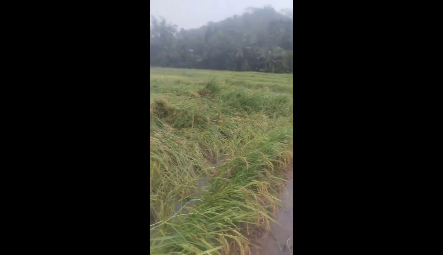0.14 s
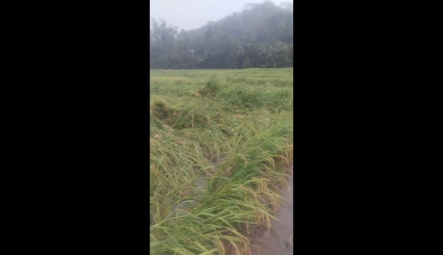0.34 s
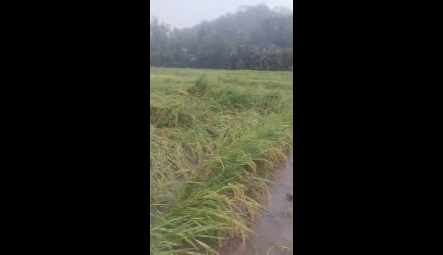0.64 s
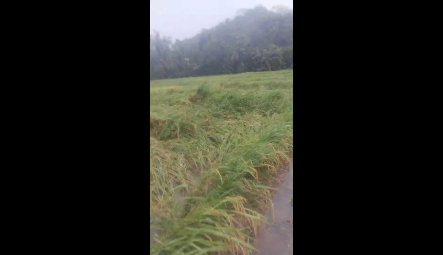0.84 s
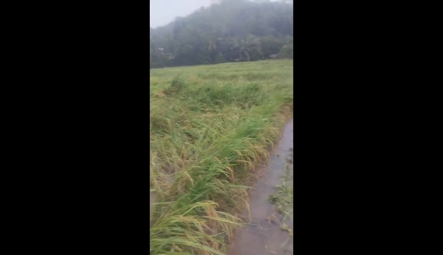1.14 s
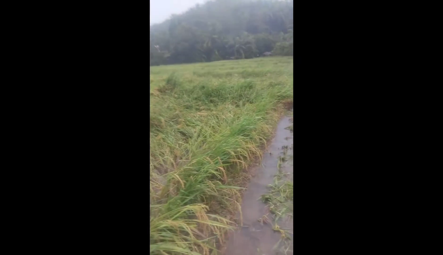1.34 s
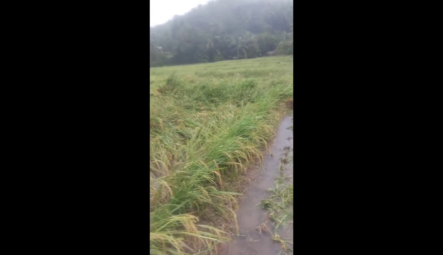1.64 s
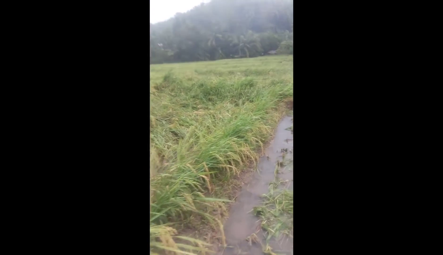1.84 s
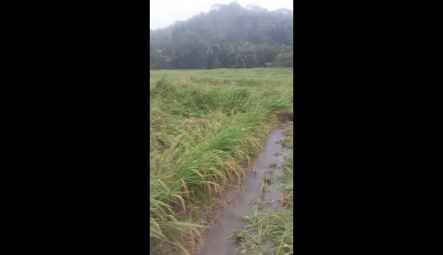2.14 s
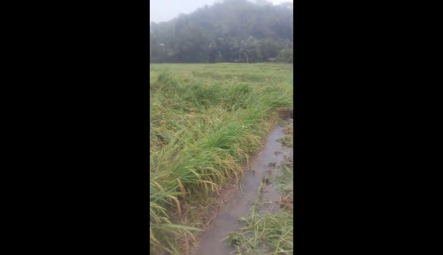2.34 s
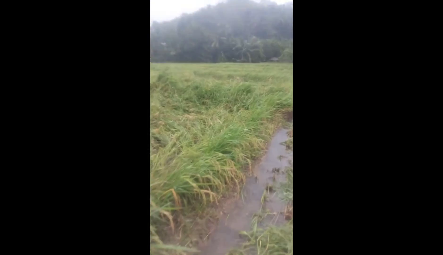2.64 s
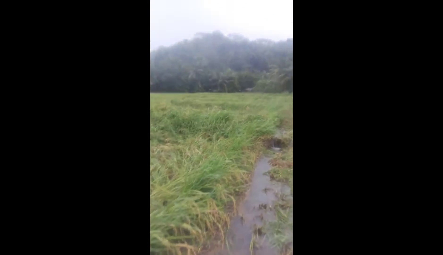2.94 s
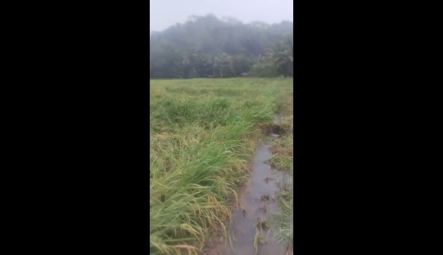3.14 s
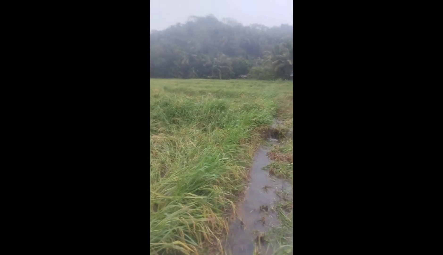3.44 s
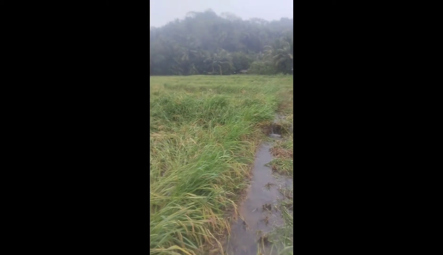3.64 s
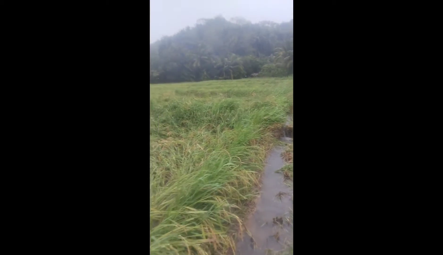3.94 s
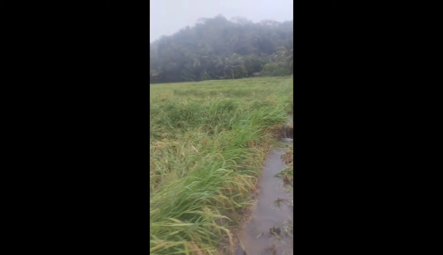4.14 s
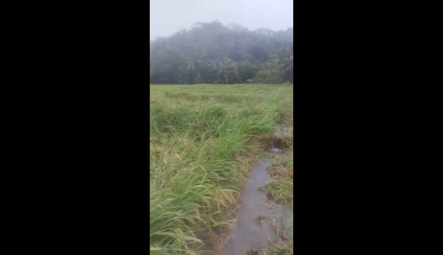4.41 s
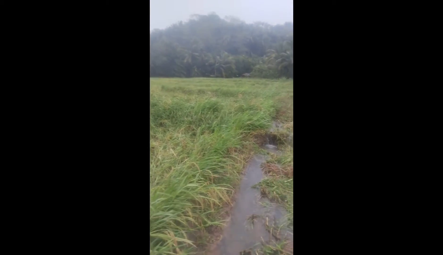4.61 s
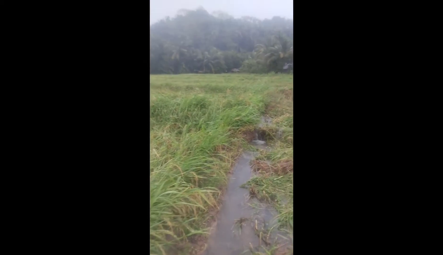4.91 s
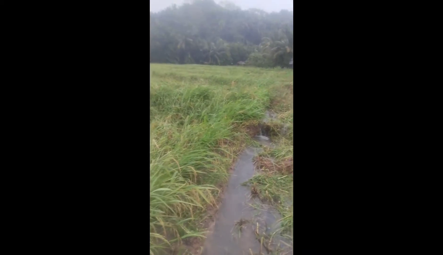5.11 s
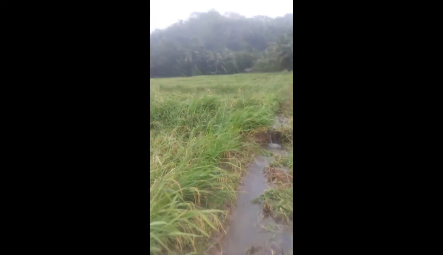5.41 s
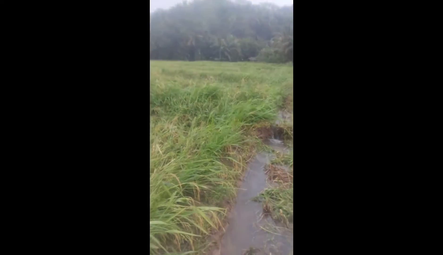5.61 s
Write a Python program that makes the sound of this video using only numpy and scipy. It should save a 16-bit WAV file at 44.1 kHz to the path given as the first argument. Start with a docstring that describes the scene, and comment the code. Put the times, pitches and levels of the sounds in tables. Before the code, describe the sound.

Boots wade through ankle-deep muddy water in a flooded rice field, close to the microphone. A dull heel thud and a sharp double slap come first, then uneven steps slosh, gurgle and plop, with spray and ticking drops. The steps grow busier in the second half, with another hard double slap, then ease off. Faint rain, insects and a few thin bird whistles lie behind, with light wind rumble on the microphone.

```python
"""A rainy rice field: boots wade through ankle-deep muddy water, close to a phone.
Soles slap the surface, and trapped air resonates: single pockets plop, swarms of bubbles slosh and spray.
Rain, insects and a whistling bird lie behind, and wind rumbles on the microphone port.
The phone's noise suppressor ducks the steady background and lets it through, band by band, after each
sound; its gain control dips after the loudest slaps."""
import sys
import numpy as np
from scipy import signal
from scipy.fft import rfft, irfft, next_fast_len
from scipy.io import wavfile
from scipy.ndimage import uniform_filter1d, map_coordinates

SR = 44100
rng = np.random.default_rng(int(sys.argv[2]) if len(sys.argv) > 2 else 0)


def transcribe(signal):
    """Save signal, clipped to [-1, 1], as a 16-bit WAV file at the path in sys.argv[1]."""
    frames = np.atleast_2d(signal).T
    limited = np.clip(frames, -1, 1)
    pcm = np.round(limited * 32767).astype(np.int16)
    wavfile.write(sys.argv[1], SR, pcm)


N = 254456
FADE_IN_S = 0.074

# sheets of water thrown up and falling back; the first two rows, low and at the very start, are a squelch of
# mud: # (time [s], level [dB], low edge [Hz], high edge [Hz], rise [s], t60 [s], spray re level [dB])
WATER_SHEETS = [(.003, -33, 152, 540, 0.012, 0.064, -51.5), (.07, -56.5, 150, 621, 0.036, 0.5, -26),
                (0.599, -40, 1007, 5980, 0.046, 0.36, -17.5), (0.702, -50, 1294, 3205, 0.078, 0.57, -13),
                (1.392, -38.5, 331, 1430, 0.0098, 0.3, -23.5), (1.52, -49, 1467, 2674, 0.0015, .3, -19),
                (1.7, -41, 883, 3370, 0.013, 0.35, -16), (2.259, -48.5, 725, 1387, 0.0058, 0.44, -24),
                (2.317, -50, 1600, 4830, 0.02, 0.47, -28.5), (2.411, -48, 1296, 5400, 0.016, 0.33, -15.5),
                (2.667, -36, 909, 4610, .014, 0.53, -23.5), (2.929, -39, 250.5, 3554, 0.015, .3, -21),
                (3.078, -46, 489.4, 2370, 0.018, 0.53, -28.5), (3.239, -49.5, 408, 1212, 0.02, 0.48, -29.5),
                (3.625, -46, 2013, 5606, 0.026, 0.8, -13.5), (3.691, -41.5, 919, 3615, .012, 0.84, -20.5),
                (3.858, -36.5, 1012, 6700, 0.005, 0.23, -14), (3.96, -43, 896, 3000, 0.016, 0.77, -21.5),
                (4.055, -42, 790, 3590, 0.018, .4, -17.5), (4.282, -47.5, 497, 3500, 0.016, .5, -17.5),
                (4.47, -58.5, 700, 1390, 0.035, .5, -28.5), (4.498, -57, 1958, 6040, .06, 0.66, -21.5),
                (4.595, -47.5, 1215, 3000, 0.015, .5, -24.5),
                (4.729, -48.5, 1730, 3203, 0.041, 0.67, -15.5), (4.788, -50, 2920, 8030, 0.046, 0.57, -8.5),
                (4.998, -36.5, 1166, 6000, 0.015, .3, -20.5)]


def amp(db):
    """Amplitude ratio of a level in decibels."""
    return np.exp(np.asarray(db) * (np.log(10) / 20))


def unit(x):
    """Normalisation to rms 1."""
    return x / np.sqrt(np.mean(x ** 2) + 1e-20)


def along(points, hz):
    """Interpolation of (frequency [Hz], value) points on a logarithmic axis."""
    knots_hz, values = np.transpose(points)
    return np.interp(np.log(hz + 1), np.log(knots_hz + 1), values)


def curves(rows):
    """Linear interpolation, sample by sample, of each column after the time."""
    times, *columns = np.transpose(rows)
    return [np.interp(np.arange(N) / SR, times, column) for column in columns]


def wobble(rate):
    """Random modulation: a smooth curve with rate knots a second."""
    knots = rng.standard_normal(int(N * rate / SR) + 4)
    return map_coordinates(knots, [np.arange(N) * rate / SR])


def band(lo_hz, hi_hz):
    """Band-pass response with sixth-order slopes."""
    return lambda hz: 1 / (1 + (lo_hz / (hz + 1)) ** 6) / (1 + (hz / hi_hz) ** 6)


def filtered(x, response):
    """Linear filtering: the spectrum times a frequency response."""
    size = next_fast_len(N + 8192)
    return irfft(rfft(x, size) * response(np.fft.rfftfreq(size, 1 / SR)), size)[..., :N]


def noise(response):
    """White noise coloured by a frequency response."""
    return filtered(rng.standard_normal(N), response)


def narrow(centre_hz, width_hz):
    """Narrow-band noise of rms 1."""
    return unit(noise(lambda hz: 1 / (1 + (2 * (hz - centre_hz) / width_hz) ** 2)))


def add(track, s, sound):
    """Superposition of a short sound at s seconds."""
    part = track[round(s * SR):][:len(sound)]
    part += sound[:len(part)]


def swell(t, rise, t60):
    """Envelope that reaches 1 in rise seconds, then decays exponentially."""
    return amp(-60 * np.abs(t - rise) / t60) * np.clip(t / rise, 0, 1) ** 2


def ring(t, hz, t60, glide=0):
    """Damped oscillator, such as a bubble, whose pitch climbs by the fraction glide within t60."""
    attack = 1 - np.exp(-t * hz * 1.6)
    phase = 2 * np.pi * hz * (t + glide * t * t / (2 * t60))
    return attack * amp(-60 * t / t60) * np.sin(phase)


def swarm(lo_hz, hi_hz, rate, cycles, scatter_db):
    """Incoherent sum, rms 1, of bubbles of random size and onset; each falls 30 dB in cycles periods."""
    when, size, strength = rng.random((int(rate * N / SR), 3)).T
    hz = lo_hz * (hi_hz / lo_hz) ** size
    gain = amp(-scatter_db * np.log(strength + 0.015))
    life = (1.15 * cycles / hz * SR).astype(int)
    # all bubbles end to end; age counts the samples since each one's onset
    age = np.arange(life.sum()) - np.repeat(np.cumsum(life) - life, life)
    start, hz, gain = (np.repeat(v, life) for v in ((when * N).astype(int), hz.astype(np.float32), gain))
    grains = gain * ring((age / SR).astype(np.float32), hz, 2 * cycles / hz, glide=0.1)
    return unit(np.bincount(start + age, grains, N)[:N])


def wind():
    """Turbulent pressure on the microphone port: a low rumble that comes in gusts."""
    spectrum = [(12, -72.5), (20, -33.5), (113, -5.5), (206, -19), (282, -25), (319, -41.5), (400, -21.5),
                (520, -51), (880, -120)]  # rumble: (frequency [Hz], relative level [dB])
    strength = [(0.0, -43.5), (0.22, -76), (1.04, -65), (1.53, -66.5), (1.72, -79), (2.14, -75),
                (2.62, -65), (2.99, -76), (3.18, -69), (3.41, -65), (3.58, -54.5), (3.84, -76.5),
                (4.13, -74), (4.31, -67.5), (4.52, -74), (4.55, -59.5), (4.84, -72.5), (4.9, -66),
                (5.11, -65.5), (5.45, -68.5), (5.77, -65.5)]  # wind before the gusts are added: (time [s], level [dB])
    rumble = unit(noise(lambda hz: amp(along(spectrum, hz))))
    gusts_db = 10 * np.abs(wobble(4)) ** 0.19
    return amp(curves(strength)[0] + gusts_db) * rumble


def splashes():
    """Bubble size sets pitch: each splash is a dense patter, filtered to its own range of sizes."""
    out, t = np.zeros(N), np.arange(SR // 2) / SR
    patter = swarm(1000, 7000, rate=2000, cycles=20, scatter_db=4)
    patter += 0.9 * swarm(250, 1500, rate=220, cycles=18, scatter_db=3)
    patter += amp(-12) * rng.standard_normal(N)  # foam
    hz = np.fft.rfftfreq(len(t), 1 / SR)
    for s, db, lo, hi, rise, t60, _ in WATER_SHEETS:
        excerpt = patter[round(s * SR):][:len(t)]
        drops = unit(irfft(rfft(excerpt) * band(lo, hi)(hz), len(t)))
        add(out, s, amp(db) * swell(t, rise, t60) * drops)
    return out


def wading():
    """Bubble resonance in four size classes, swelling as the legs push water, over a hiss of foam."""
    flow = [(0.0, -74.5, -81), (0.18, -79.5, -78), (0.46, -77.5, -78), (0.69, -46.5, -68.5),
            (0.9, -63, -58), (1.16, -65, -66.5), (1.64, -65, -65.5), (2.1, -69.5, -64.5),
            (2.71, -55.5, -64.5), (2.83, -54, -59), (2.97, -42, -69.5), (3.18, -61.5, -74.5),
            (3.39, -58, -76), (3.91, -51.5, -71.5), (4.1, -53, -72.5), (4.4, -62.5, -73.5),
            (4.72, -54, -60.5), (4.92, -60, -67), (5.16, -69, -62.5), (5.77, -78, -70.5)]  # water pushed by the legs: (time [s], slosh level [dB], spray level [dB])
    # large bubbles welling up as a boot sinks or pulls free: (time [s], level [dB], t60 [s])
    gurgles = [(.53, -42.5, 0.39), (0.649, -68.5, 0.42), (1.397, -41, 0.17), (2.27, -61, 0.8),
               (2.628, -48, 0.34), (2.911, -48, 0.31), (2.978, -39.5, 0.15), (3.085, -47.5, 0.34),
               (3.25, -52, 0.68), (3.472, -38.5, 0.26), (3.571, -49, 0.16), (3.72, -59, 0.56),
               (4.05, -53, 0.81), (4.182, -34.5, 0.52), (4.21, -30, 0.14), (4.288, -49.5, 0.12),
               (4.439, -55.5, 0.79), (4.7, -51.5, 0.24), (4.9, -64, 0.37), (5.5, -61, 0.43)]
    # bubbles of gurgle, slosh, froth and spray: (lowest [Hz], highest [Hz], rate [1/s], life [cycles])
    size_classes = [(267, 2600, 490, 5.2), (830, 3900, 1600, 11), (3960, 8000, 1200, 5.5),
                    (8800, 15000, 3300, 1.5)]
    out, t = np.zeros(N), np.arange(SR // 2) / SR
    slosh_db, spray_db = curves(flow)
    slosh, spray = amp(slosh_db), amp(spray_db - 1.5)
    gurgle = np.full(N, amp(-78))  # floor between gurgles
    for s, db, t60 in gurgles:
        add(gurgle, s, amp(db) * swell(t, rise=0.0081, t60=t60))
    for s, db, _, _, rise, t60, thrown_db in WATER_SHEETS:
        add(spray, s, amp(db + thrown_db) * swell(t, rise, t60))
    froth = np.sqrt(slosh * spray) * amp(1.5)
    for envelope, (lo, hi, rate, cycles) in zip([gurgle, slosh, froth, spray], size_classes):
        foam = amp(-4) * unit(noise(band(lo, hi)))
        bubbles = filtered(swarm(lo, hi, rate, cycles, scatter_db=7.5), band(lo, hi))
        flutter = amp(1.2 * np.clip(wobble(25), -2, 2))
        out += envelope * flutter * unit(bubbles + foam)
    return out


def drips():
    """Single drops fall off the leaves, each a brief damped oscillation."""
    # dripping: (lowest [Hz], highest [Hz], rate [1/s], life [cycles], level [dB])
    drops = (897, 4197.5, 65.5, 24, -65)
    lo, hi, rate, cycles, db = drops
    return amp(db) * swarm(lo, hi, rate, cycles, scatter_db=2)


def rain():
    """Countless impacts on leaves and water add incoherently to a wavering broadband noise."""
    spectrum = [(200, -52.5), (570, -45.5), (1150, -43), (1800, -47), (2650, -48.5), (4200, -55),
                (5200, -62), (6000, -51.5), (10800, -62), (13400, -51.5), (15000, -63.5), (15700, -69.5)]  # rain hiss: (frequency [Hz], gain on white noise [dB])
    hiss = noise(lambda hz: amp(along([(100, -105.5)] + spectrum, hz)))
    return hiss * amp(0.6 * wobble(8) + 1.2 * wobble(40))


def insects():
    """The calls of a far chorus merge into one band of amplitude-modulated noise."""
    call_band = (8050, 840)  # pitch range of the calls: (centre [Hz], width [Hz])
    chorus = [(.1, -71), (.27, -60), (.58, -61), (1.3, -57.5), (1.93, -55.5), (2.43, -57.5), (3.49, -59.5),
              (3.87, -58.5), (4.25, -62), (5.0, -56.5), (5.77, -57)]  # swell of the chorus: (time [s], level [dB])
    return amp(curves(chorus)[0] + 0.6 * wobble(4.2) + 1.4 * wobble(150)) * narrow(*call_band)


def murmur():
    """Narrow noise bands flicker by random amplitude modulation, like far frogs and crickets."""
    voices = [(1420, 130), (3350, 78), (4580, 130), (5150, 57)]  # background bands: (centre [Hz], width [Hz])
    levels = [(.1, -70, -72.5, -71.5, -71), (.45, -58.5, -71.5, -73, -67), (.9, -58, -69.5, -66.5, -70),
              (1.3, -56, -67.5, -67, -67), (1.85, -56, -70.5, -70.5, -67.5), (2.15, -59, -71.5, -70, -65.5),
              (2.5, -54, -68, -70.5, -66.5), (2.85, -52.5, -68, -73.5, -69),
              (3.299, -55.5, -69.5, -72.5, -74.5), (4.5, -56, -69, -71.5, -68.5),
              (5.2, -62.5, -63, -71, -68), (5.4, -55, -71, -68, -68), (5.77, -60, -71.5, -74, -74)]  # their swell: (time [s], level of each of the four bands [dB])
    return sum(amp(db + 2.85 * wobble(35) + 1.2 * wobble(6.6)) * narrow(hz, width)
               for (hz, width), db in zip(voices, curves(levels)))


def ticks():
    """An impulse has a broad spectrum: bright spikes trailing crackle, with faint ones at random."""
    impacts = [(0.389, -33.5), (0.5164, -22), (0.5465, -20.5), (0.6545, -25.5), (.783, -38), (0.8074, -43),
               (0.8934, -35), (0.9283, -35), (0.9622, -30.5), (1.0294, -45), (1.1364, -43.5), (1.285, -40),
               (1.3957, -30), (1.4067, -26.5), (1.703, -27.5), (2.1505, -39.5), (2.1844, -30.5),
               (2.4688, -32), (2.6309, -26), (2.677, -35), (2.7044, -31.5), (2.7841, -27.5), (2.803, -40),
               (2.9014, -32), (2.9333, -45.5), (2.9512, -36.5), (2.9905, -25), (3.0045, -36.5),
               (3.2535, -30.5), (3.3044, -37.5), (3.4741, -28), (3.4987, -34), (3.5613, -26.5),
               (3.6423, -37.5), (3.6682, -34), (3.6965, -28.5), (3.8014, -38), (3.8474, -41.5),
               (3.8691, -29), (3.8822, -26.5), (4.0196, -40), (4.0598, -38.5), (4.0801, -32.5),
               (4.1481, -32), (4.2076, -22.5), (4.2926, -39.5), (4.3051, -32.5), (4.8266, -35.5),
               (5.0075, -33), (5.0324, -34), (5.3607, -31.5)]  # drops striking leaves and boots, water films tearing: (time [s], level [dB])
    faint_per_s, t60 = 25, 0.004
    out, t = np.zeros(N), np.arange(SR // 50) / SR
    when, size = rng.random((int(faint_per_s * N / SR), 2)).T
    faint_s = FADE_IN_S + when * (N / SR - FADE_IN_S)
    faint_db = -51 - 4 * np.log(size + 0.1)
    spike = 4.1 * (t == 0)
    for s, db in [*impacts, *zip(faint_s, faint_db)]:
        crackle = amp(-60 * t / t60) * rng.standard_normal(len(t))
        add(out, s, amp(db) * (spike + crackle))
    return filtered(out, lambda hz: band(3550, 7514)(hz) + amp(-7.5) * band(9000, 15200)(hz))


def plops():
    """An air pocket is a spring loaded by water: it rings, then again more weakly; its film clicks."""
    pockets = [(.118, -29, 304, 0.0088), (0.493, -31.5, 1320, 0.012), (0.653, -22, 1980, 0.0057),
               (0.705, -39.5, 950, 0.0283), (0.788, -36, 1914, 0.033), (0.895, -35.5, 1406, 0.03),
               (0.955, -40, 1348, 0.0422), (1.054, -43.5, 2370, 0.022), (1.123, -41.5, 503, 0.033),
               (1.389, -19.5, 687, 0.0046), (1.453, -32, 510, 0.019), (1.495, -40, 756, 0.091),
               (1.521, -23, 1910, 0.009), (1.653, -38, 1296, 0.062), (1.703, -28.5, 940, 0.018),
               (1.731, -31.5, 1320, 0.027), (1.775, -34, 1402, 0.051), (2.007, -42, 2670, 0.021),
               (2.183, -42.5, 3825, 0.016), (2.264, -33.5, 957, 0.06), (2.278, -37, 995, 0.0404),
               (2.305, -36, 913, 0.051), (2.33, -44, 1784, .04), (2.369, -38.5, 1455, 0.068),
               (2.416, -39.5, 2820, 0.046), (2.419, -35.5, 1466, 0.053), (2.455, -41.5, 3700, 0.0095),
               (2.469, -35.5, 5330, 0.019), (2.538, -38.5, 3350, 0.012), (2.657, -31, 4240, 0.0099),
               (2.685, -30, 1357, 0.058), (2.758, -31, 1730, 0.019), (2.781, -21.5, 2860, 0.017),
               (2.9, -32.5, 754, 0.032), (2.917, -27.5, 1410, 0.034), (2.932, -29, 760, 0.0398),
               (2.946, -25, 1480, 0.0412), (2.959, -16, 1325, 0.01198), (2.97, -24.5, 1460, .015),
               (3.023, -32, 1383, 0.059), (3.09, -30, 902, 0.037), (3.22, -39, 470, 0.072),
               (3.248, -25.5, 705, 0.032), (3.304, -39, 598, 0.078), (3.356, -38.5, 726, 0.068),
               (3.375, -37.5, 2216, 0.037), (3.415, -36.5, 3540, 0.017), (3.499, -30.5, 1000, 0.025),
               (3.696, -17, 1550, 0.0049), (3.712, -32, 758, 0.0276), (3.741, -20.5, 1253, 0.026),
               (3.847, -29.5, 1470, 0.025), (3.871, -23.5, 1283, 0.026), (3.88, -10.5, 2270, 0.0026),
               (3.907, -21.5, 2180, 0.0093), (3.972, -26.5, 1217, 0.03), (4.03, -37.5, 1107, 0.143),
               (4.074, -31, 1700, 0.017), (4.148, -24.5, 2900, 0.0085), (4.219, -18.5, 600, .02),
               (4.293, -28, 2770, 0.0094), (4.304, -37.5, 1424, 0.048), (4.369, -44, 460, 0.086),
               (4.434, -43.5, 470, 0.121), (4.453, -32, 531, 0.0565), (4.478, -40.5, 990, 0.14),
               (4.549, -40, 2120, 0.0403), (4.604, -40, 2450, .027), (4.62, -36, 1920, 0.045),
               (4.649, -43, 1900, 0.071), (4.708, -40.5, 870, 0.038), (4.782, -37, 2420, 0.014),
               (4.902, -38, 483, 0.039), (4.992, -41, 1264, 0.0669), (5.024, -34, 1375, 0.048),
               (5.33, -40.5, 1413, 0.041), (5.462, -42, 924, 0.03), (5.503, -40, 301, 0.067),
               (5.763, -26.5, 1387, 0.0124)]  # air pockets and drops: (time [s], level [dB], frequency [Hz], t60 [s])
    out, t = np.zeros(N), np.arange(SR // 8) / SR
    for (s, db, hz, t60), (detune, lag) in zip(pockets, rng.random((len(pockets), 2))):
        onset = np.sin(np.pi / 2 * np.clip(t / (0.1 * t60), 0, 1)) ** 2
        add(out, s - 0.054 * t60, amp(db + 3.5) * onset * ring(t, hz, t60, glide=0.0076))
        again_s = s + min(0.035, 0.7 * t60) * (0.24 + lag)
        again_hz = hz * (0.9 + 0.22 * detune)
        add(out, again_s, amp(db - 3.5) * onset * ring(t, again_hz, 0.75 * t60, glide=0.015))
        click = rng.standard_normal(len(t)) * amp(-60 * t / 0.0081)
        add(out, s + 0.0019, amp(db - 25) * click)
    return out


def heel_thud():
    """A heel's impact on mud excites two damped modes, a low push and a short knock, and a squelch."""
    # the impact: (level [dB], push [Hz], t60 [s], knock [Hz], knock re level [dB], squelch re level [dB])
    impact = (-22.5, 98.5, 0.26, 391.5, -9, -10.5)
    db, push_hz, t60, knock_hz, knock_db, squelch_db = impact
    contact_s = 0.394
    out, t = np.zeros(N), np.arange(SR // 4) / SR
    add(out, contact_s + 0.005, amp(db) * ring(t, push_hz, t60))
    add(out, contact_s, amp(db + knock_db) * ring(t, knock_hz, t60=0.048))
    mud = unit(noise(band(91, 260)))[:len(t)]
    add(out, contact_s, amp(db + squelch_db - 60 * t / 0.31) * mud)
    return out


def sole_slaps():
    """Water entry: the film tears with a crack, mud thumps, the sole smacks and trapped air resonates."""
    # soles hitting the water: (time [s], level [dB], cavity [Hz], cavity t60 [s], smack [Hz],
    # smack re level [dB], crack re level [dB], spread [s], thump re level [dB])
    landings = [(0.5158, -9.5, 910, 0.0052, 1106, 0.5, -9, 0.00064, -23),
                (0.545, -4, 650, 0.0085, 1286, 5.5, 3, 0.0022, -43),
                (1.41, -12, 668, 0.023, 903, -2, -15.5, 0.0026, -27.5),
                (2.63, -18, 593, 0.015, 1105, 5, -9.5, 0.0013, -44),
                (3.474, -4, 484, 0.014, 1340, 4, 0.5, 0.00058, -3),
                (3.558, -13, 646, 0.0052, 1100, -3.5, -16.5, 0.0032, -15),
                (4.1718, -4.5, 595, 0.043, 1550, 8, -13, 0.002, -34),
                (4.2086, 4.5, 720, 0.012, 1247, 7, -0.5, 0.0014, -28)]
    out, cracks, t = np.zeros(N), np.zeros(N), np.arange(SR // 8) / SR
    for s, db, cavity_hz, t60, smack_hz, smack_db, crack_db, spread, thump_db in landings:
        tearing = np.exp(-3 * (t / spread - 1) ** 2)
        add(cracks, s, amp(db + crack_db) * tearing * rng.standard_normal(len(t)))
        add(out, s + spread, amp(db + thump_db) * ring(t, hz=260, t60=0.016))
        add(out, s + 1.1 * spread, amp(db + smack_db) * ring(t, smack_hz, t60=0.0069))
        add(out, s + 1.3 * spread, amp(db) * ring(t, cavity_hz, t60, glide=0.027))
    return out + filtered(cracks, lambda hz: band(1500, 3600)(hz) + amp(-14.5) * band(5400, 7000)(hz)
                          + amp(-23.5) * band(400, 8000)(hz) + amp(-34) * band(9500, 14500)(hz))


def bird():
    """Frequency-modulated pure tones: thin whistles glide as they swell, then drop and fade."""
    # whistles: (time [s], length [s], first pitch [Hz], pitch when loudest [Hz], level [dB])
    whistles = [(1.113, .11, 3160, 3300, -49), (1.619, 0.04, 3150, 3334, -54),
                (1.698, 0.14, 3438, 3370, -57), (2.035, 0.072, 3236, 3356, -54.5),
                (4.886, 0.063, 3326, 3287, -68), (5.122, 0.03, 3310, 3360, -61.5),
                (5.199, 0.06, 3370, 3340, -59)]
    peak_fraction, drop_hz = 0.72, 200
    out = np.zeros(N)
    for s, length, first_hz, peak_hz, db in whistles:
        progress = np.arange(int(length * SR)) / (length * SR)
        pitch = np.interp(progress, [0, peak_fraction, 1], [first_hz, peak_hz, peak_hz - drop_hz])
        envelope = amp(-9 * np.abs(progress - peak_fraction)) * signal.windows.tukey(len(progress), 0.3)
        tone = np.sqrt(2) * np.sin(2 * np.pi * np.cumsum(pitch) / SR)
        add(out, s, amp(db) * envelope * tone)
    return out


def scene():
    """Superposition of all sources in one channel; the wading and the background fade in."""
    background = drips() + rain() + insects() + murmur()
    foreground = wind() + sole_slaps() + heel_thud() + plops() + ticks() + splashes()
    fade_in = amp(-22 * np.clip((FADE_IN_S - np.arange(N) / SR) / 0.0093, 0, 1))
    return (foreground + bird() + fade_in * (wading() + background))[None]


def noise_suppressor(x, margin_db, release_s):
    """Spectral gating: a band opens when it rises over its quiet level and closes within release_s."""
    deepest_cut = [(150, -2), (500, -14), (1000, -18), (5300, -21), (6300, -4), (9000, -4), (10800, -12),
                   (12000, -11), (13500, -6)]  # a closed band: (frequency [Hz], gain [dB])
    hz, t, spectra = signal.stft(x, SR, nperseg=512, noverlap=384)
    power = uniform_filter1d(np.abs(spectra) ** 2, size=2, axis=0)
    power = np.abs(uniform_filter1d(power, size=5, axis=1, origin=2))
    quiet = np.percentile(power, 25, axis=1, keepdims=True)
    opening = np.clip(1 - amp(margin_db) ** 2 * quiet / (power + 1e-20), 0, 1)
    opening[:, t < 0.0043] = 1  # every band starts open
    for k in range(1, len(t)):
        opening[:, k] = np.maximum(opening[:, k], opening[:, k - 1] - t[1] / release_s)
    # cubic law: a band lingers near open, then shuts quickly
    gain = amp(along(deepest_cut, hz)[:, None] * (1 - opening) ** 3)
    return signal.istft(spectra * gain, SR, nperseg=512, noverlap=384)[1][:N]


def gain_control(x, knee_db, recovery_s):
    """Feed-forward compression: a loud blow pulls the gain down 5 ms later, then the gain recovers."""
    pole = np.exp(-1 / (recovery_s * SR))
    delayed_power = np.pad(x ** 2, (SR // 200, 0))[:N]
    mean_power = signal.lfilter([1 - pole], [1, -pole], delayed_power)
    return x / (1 + mean_power / amp(knee_db) ** 2) ** 0.32


def record(dry):
    """The phone's signal chain: a small microphone's high-pass, suppressor, gain control, band limit."""
    bass_hz, top_hz = 45, 15880
    heard = filtered(dry[0], lambda hz: (1j * hz / (bass_hz + 1j * hz)) ** 3)
    ducked = noise_suppressor(heard, margin_db=8, release_s=0.18)
    compressed = gain_control(ducked, knee_db=-33, recovery_s=0.021)
    return filtered(compressed[None], lambda hz: hz < top_hz)


dry = scene()
out = record(dry)
transcribe(out)
```